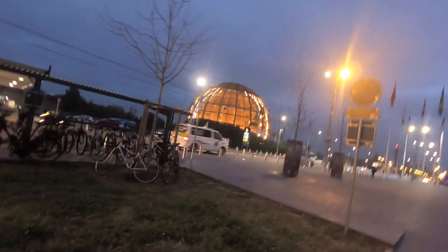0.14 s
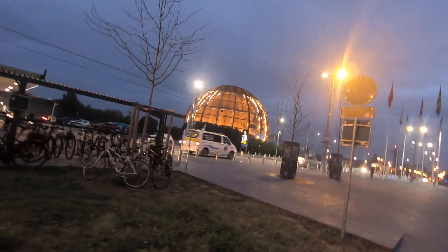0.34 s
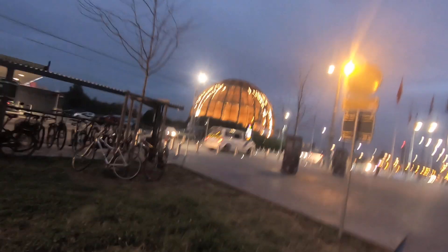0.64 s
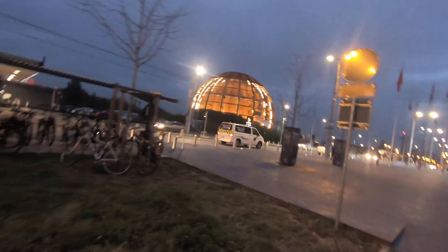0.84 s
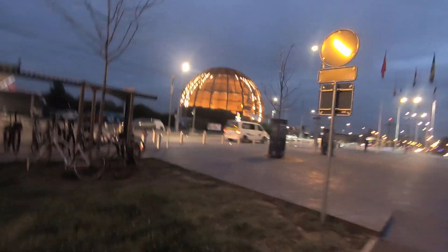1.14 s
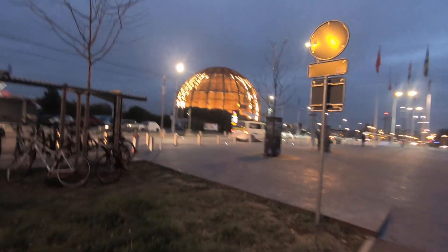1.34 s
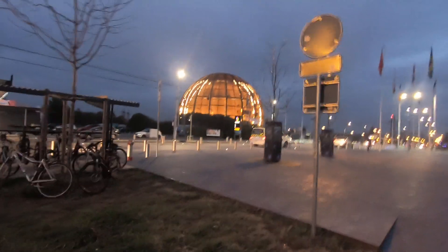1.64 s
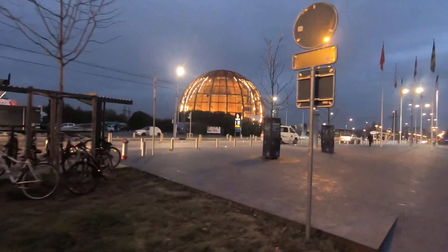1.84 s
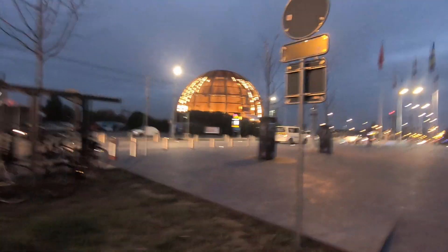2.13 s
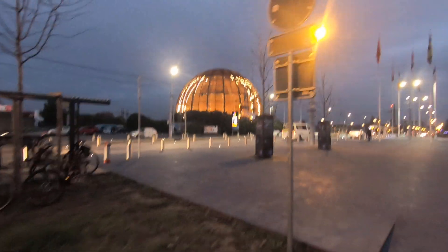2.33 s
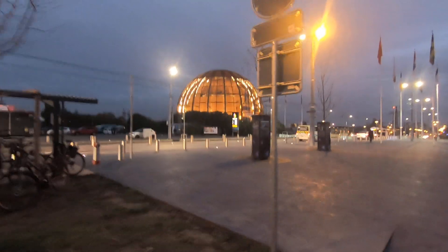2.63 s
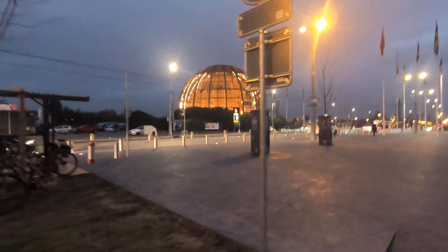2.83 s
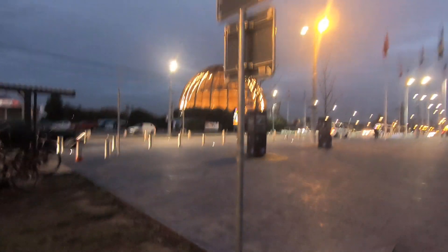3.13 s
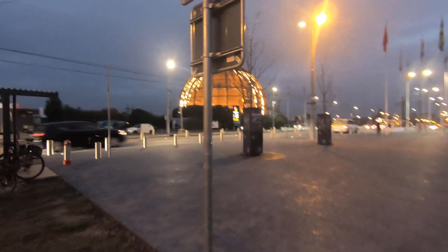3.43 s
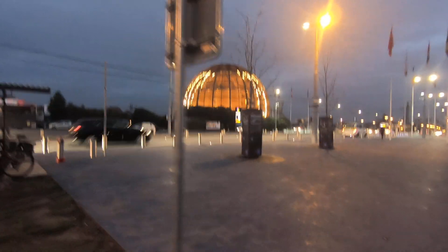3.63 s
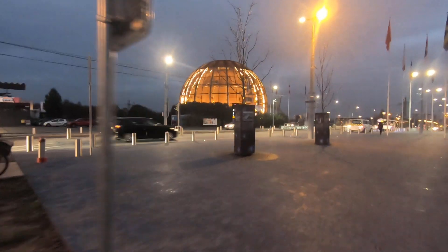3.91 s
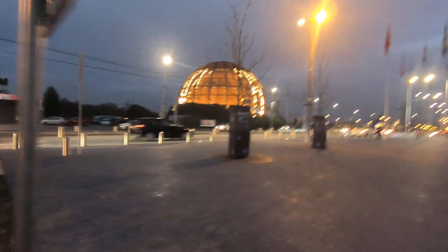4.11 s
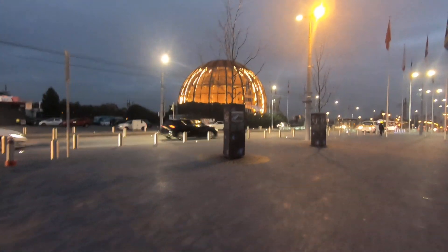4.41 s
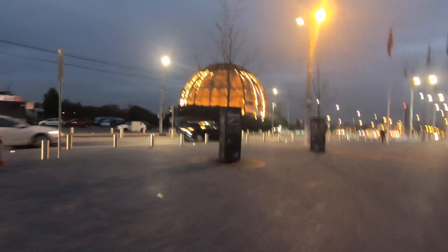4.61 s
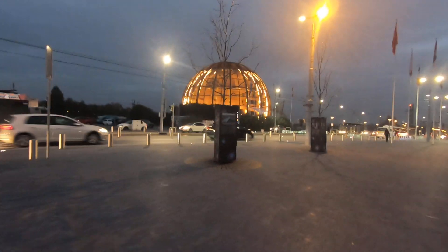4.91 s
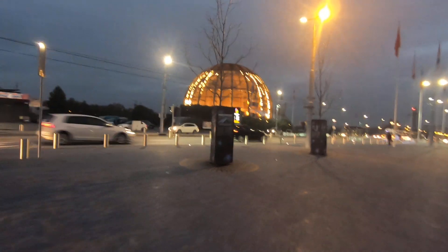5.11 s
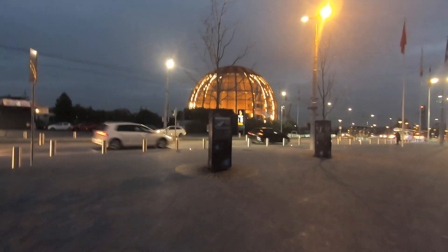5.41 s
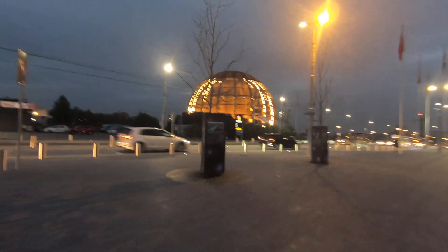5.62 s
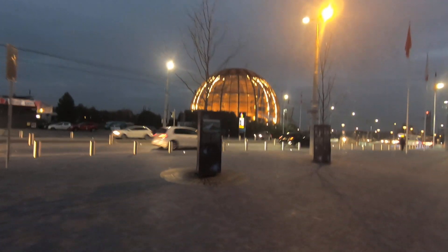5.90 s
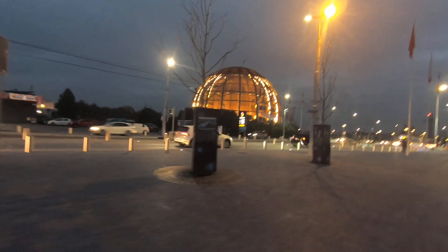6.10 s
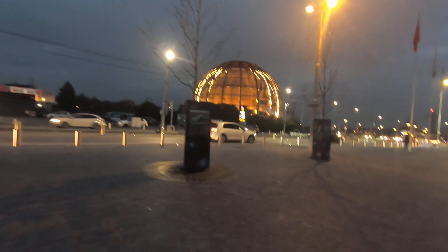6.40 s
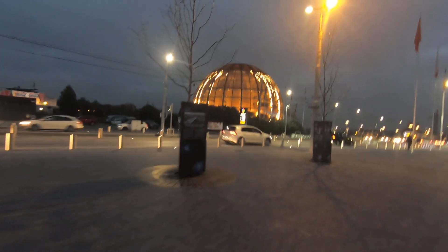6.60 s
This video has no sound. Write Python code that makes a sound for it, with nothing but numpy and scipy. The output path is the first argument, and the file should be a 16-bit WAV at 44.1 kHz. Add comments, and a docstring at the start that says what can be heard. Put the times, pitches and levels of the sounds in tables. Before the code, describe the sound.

Close to the microphone, a twin-cylinder motorcycle throbs in a deep, limping beat beside a busy open road. It pulls gradually harder, growling and rasping, with small ticks from a loose part near the end. The throttle then shuts with a pop and the engine sinks to a soft, irregular burble, while tyre noise, low rumble and a passing car's hum come forward.

```python
"""A V-twin motorcycle engine throbs beside a busy road, gathers a little speed, then drops to an uneven burble.
Each firing is a pulse that rings the exhaust pipe: a thump below, with growl, bark and rasp under throttle.
Noise in two narrow bands makes the intake's faint hoot; short noise bursts make a loose part's ticks. Behind it
cars pass as coloured noise for tyres over a low rumble that swells now and then, and a stack of sines for one
humming engine. A short airy tone of narrow noise, swishes in the treble and one thin brake squeal of sines are
also heard."""
import sys
import numpy as np
from scipy import signal
from scipy.fft import rfft, irfft
from scipy.io import wavfile
from scipy.ndimage import uniform_filter1d

SR = 44100
rng = np.random.default_rng(int(sys.argv[2]) if len(sys.argv) > 2 else 0)


def unload_wav(signal):
    """Save mono or channel-first audio to the path in sys.argv[1] as 16-bit WAV at rate SR, clipped to [-1, 1]."""
    wavfile.write(
        sys.argv[1],
        SR,
        np.round(np.clip(np.atleast_2d(signal).T, -1, 1) * 32767).astype(np.int16),
    )


N = 297671
TIME = np.arange(N) / SR
BINS = np.fft.rfftfreq(N, 1 / SR)

# Engine speed, two firings in each cycle. Each row: time in seconds, cycles per second in Hz.
ENGINE_SPEED = [(0.0, 13.81), (0.12, 14.8), (.26, 15.1), (.44, 14.93), (.6, 15.11), (1.55, 15.703),
                (1.95, 15.705), (2.5, 16.3), (3.0, 16.745), (3.65, 16.855), (4.2, 17.3), (4.7, 18.56),
                (5.0, 18.24), (5.3, 16.997), (5.8, 16.001), (6.75, 15.799)]
# Unevenness of combustion. Each row: time in seconds, spread of push strength in dB, spread of firing
# time in seconds, gap between the two cylinders in cycles, extra crack of the second cylinder in dB.
COMBUSTION = [(0, .7, .0003, .422, -1), (1.4, .7, .0002, .42, .5), (1.8, 1.2, .0003, .42, .5),
              (2.4, .8, .0002, .424, 2), (3.0, .9, .00025, .425, 3), (3.45, 1.3, .0005, .422, 1),
              (4.1, .7, .0002, .427, 3), (4.7, .6, .00015, .419, -.5), (4.95, 3, .002, .42, 0),
              (6.75, 3.5, .003, .42, 0)]
# Throttle: cruising, a blip, a long pull, then shut. Each row: time in seconds, effort in dB above cruising.
EFFORT = [(0, -3.5), (.15, -1.5), (1.35, 0.5), (1.75, -4), (2.25, -3.5), (2.5, 2.5), (2.7, -3), (3.3, -1.5),
          (4.0, 0), (4.3, 1.5), (4.68, 3), (4.85, -11), (5.25, -21), (5.7, -26), (5.95, -16), (6.75, -24.5)]


def motorcycle():
    """Firings ring the pipe with a thump; an open throttle adds growl, bark and rasp, ruffled by rushing gas."""
    # Exhaust pipe and silencer. Each row: frequency in Hz, relative gain in dB.
    pipe_spectrum = [(20, -52), (45, -21), (60, -4.5), (75, -0.2), (86, -4), (120, 4), (152, -10.5),
                     (170, -7), (188, -18.5), (222, -14), (268, -21), (305, -18.5), (335, -19.5),
                     (390, -27), (480, -47), (2500, -100)]
    # Pops as the throttle shuts. Each row: start in seconds, peak of the pipe in dB, peak of the rasp in dB.
    pops = [(4.912, -11.5, -27), (4.976, -20, -48.5)]
    effort = curves(EFFORT)[0]
    pushes, cracks = firings()
    pipe = ring(pipe_spectrum)
    exhaust = signal.fftconvolve(pushes, pipe)[:N]
    fronts = signal.fftconvolve(cracks, pipe)[:N]
    growl_hz, bark_hz = 148, 262  # where the growl takes over from the thump, and the bark from the growl
    low = below(exhaust, growl_hz)
    thump = exhaust_thump(low, effort)
    growl = exhaust_growl(below(exhaust - low, bark_hz), effort)
    bark = exhaust_bark(fronts - below(fronts, bark_hz), effort)
    rasp, crack = exhaust_rasp(cracks)

    gas_db, rasp_gas_db = -17, -11  # depth of the ruffling
    ruffled_growl = growl * (1 + amp(gas_db) * drift(75))
    ruffled_rasp = rasp * (1 + amp(rasp_gas_db) * drift(100))
    upper = ruffled_growl + bark + ruffled_rasp
    direct = thump + upper + reflection(upper)
    for s, db, crack_db in pops:
        add(direct, s, amp(db) * pipe / abs(pipe).max() + amp(crack_db) * crack / abs(crack).max())
    echo_db, thump_echo_db = -11, -24
    return direct + scattered_echoes(amp(echo_db) * upper + amp(thump_echo_db) * thump)


def firings(second_db=-1, crack_spread=1.8):
    """Two pulse trains: the push of each firing, and the crack of its front, which varies more in strength."""
    s = firing_times()
    spread_db, jitter_s, _, second_crack_db = curves(COMBUSTION, s)
    strength, late = np.clip(rng.standard_normal((len(s), 2)), -2, 2).T
    second = np.arange(len(s)) % 2
    pushes, cracks = np.zeros((2, N))
    at = np.clip(np.round((s + jitter_s * late) * SR).astype(int), 0, N - 1)
    pushes[at] = amp(spread_db * strength + second * second_db)
    cracks[at] = amp(crack_spread * spread_db * strength + second * second_crack_db)
    return pushes, cracks


def firing_times(first=0.029):
    """Two cylinders fire close together, then rest: a limping rhythm."""
    cycles = np.cumsum(curves(ENGINE_SPEED)[0]) / SR
    lead = np.arange(int(cycles[-1]) + 1) + first  # in cycles
    gap = curves(COMBUSTION, np.interp(lead, cycles, TIME))[2]
    return np.interp(np.column_stack([lead, lead + gap]).ravel(), cycles, TIME)


def exhaust_thump(low, effort):
    """The deepest voice of the pipe wavers a little, and its upper part fades for moments."""
    # Fades of the upper part. Each row: middle in seconds, half width in seconds, depth in dB.
    thump_fades = [(1.6, 0.056, 2), (2.72, .08, 2), (3.4, .14, 14), (4.0, .12, 3)]
    cruising_db, db_per_effort_db, waver_db = -19, 0.46, 0.5
    level = amp(cruising_db + db_per_effort_db * effort + waver_db * drift(3.2))
    thump = level * levelled(low)
    upper_part = thump - below(thump, 100)
    fade = amp(sum(dip(*row) for row in thump_fades))
    return thump + (fade - 1) * upper_part


def exhaust_growl(band, effort):
    """The middle voice of the pipe follows the throttle, with one short extra swell."""
    cruising_db, db_per_effort_db = -35, 1
    swell_db = -dip(2.18, 0.2, 4)
    return amp(cruising_db + db_per_effort_db * effort + swell_db) * levelled(band)


def exhaust_bark(high, effort):
    """The sharp fronts bark, and the silencer shell rings on between firings as a decaying resonance."""
    cruising_db, db_per_effort_db = -39.5, 1.18
    shell_hz, shell_t60_s, shell_db = 322, 0.11, -5  # shell level against the fronts
    shell = np.cos(2 * np.pi * shell_hz * TIME) * np.exp(-np.log(1000) * TIME / shell_t60_s)
    ringing = levelled(signal.fftconvolve(high, shell)[:N])
    bark = levelled(high) + amp(shell_db) * ringing
    return amp(cruising_db + db_per_effort_db * effort) * levelled(bark)


def exhaust_rasp(cracks):
    """Cracks excite a moving resonance; returns the rasp and the impulse response of a single crack."""
    # Colour of a crack. Each row: frequency in Hz, relative gain in dB.
    crack_spectrum = [(100, -26.5), (195, -9.5), (280, -9.5), (360, 0.5), (440, 1.5), (500, -8), (600, -11),
                      (1200, -28), (8000, -90.5)]
    # Rasp over time. Each row: time in seconds, level in dB, centre in Hz.
    rasp_course = [(0, -50.5, 362), (.35, -44, 365), (1.45, -46, 360), (1.85, -53.5, 370), (2.2, -52, 370),
                   (2.48, -43.5, 430), (2.8, -49.5, 370), (3.5, -48, 378), (4.0, -42, 392),
                   (4.65, -39.5, 385), (4.85, -50.5, 390), (5.2, -62, 350)]
    db, centre_hz = curves(rasp_course)
    crack = ring(crack_spectrum)
    rasp = resonate(signal.fftconvolve(cracks, crack)[:N], centre_hz, width_hz=68)
    return amp(db) * levelled(rasp), crack


def reflection(x):
    """One strong echo off a nearby surface; its delay grows, so that partials swell and fade in turn."""
    delay_s, growth_s_per_s, db = 0.00875, 0.001686, -10
    return amp(db) * np.interp(TIME - delay_s - growth_s_per_s * TIME, TIME, x, left=0)


def intake():
    """Once a cycle the engine sucks air, and its intake hoots in two narrow bands that fade over the scene."""
    # Intake resonances. Each row: centre in Hz, width in Hz, level in dB before throttle and fade.
    resonances = [(560, 27, -57), (1012, 35, -49)]
    gulp_at, sharpness = 0.55, 1.2  # place of the gulp in the cycle, and how short it is
    db_per_effort_db, fade_db_per_s, echo_db = 1, 3, -6.5
    cycles = np.cumsum(curves(ENGINE_SPEED)[0]) / SR
    gulp = unit(np.exp(sharpness * np.cos(2 * np.pi * (cycles - gulp_at))))
    air = below(rng.standard_normal(N), 1400)
    bands = sum(amp(db) * unit(resonate(air, np.full(N, hz), width_hz)) for hz, width_hz, db in resonances)
    hoot = bands * gulp * amp(db_per_effort_db * curves(EFFORT)[0] - fade_db_per_s * TIME)
    return hoot + scattered_echoes(amp(echo_db) * hoot)


def ticks():
    """A loose part ticks on the left, each tick with a thin bright edge; clicks and scuffs sound close by."""
    # Loose part, during the long pull. Each row: start in seconds, peak of the body in dB before the
    # lean to the left, centre in Hz.
    loose_part = [(4.102, -53, 8000), (4.132, -57, 9300), (4.156, -57, 8000), (4.189, -56, 9700),
                  (4.213, -47, 9100), (4.246, -51, 9500), (4.271, -47, 8700), (4.303, -55, 8400),
                  (4.334, -51, 6700), (4.360, -54, 9800), (4.384, -49, 9200), (4.416, -46, 8900),
                  (4.44, -53, 8200), (4.472, -55, 8700), (4.495, -53, 8900)]
    # Clicks and scuffs. Each row: start in seconds, peak in dB, centre in Hz, t60 in seconds, width in octaves.
    scuffs = [(1.235, -46, 3900, .4, .35), (2.05, -39, 3200, .3, .33), (2.30, -40, 3300, .26, .33),
              (3.449, -45, 5800, .1, .42), (3.754, -33, 4500, .005, .45), (3.7585, -40, 6500, .006, .35),
              (3.782, -44, 4400, .03, .25), (3.91, -54, 8600, .03, .1), (5.104, -47.5, 8000, .11, .3),
              (5.265, -58, 9000, .02, .25), (6.548, -50, 8500, .03, .12)]
    t60_s, octaves, edge_hz, edge_db, lean_db = 0.023, 0.12, 11500, -17, 4  # lean: left over right
    out = np.zeros((2, N))
    lean = amp(np.array([[.5], [-.5]]) * lean_db)
    for s, db, hz in loose_part:
        body = burst(hz, t60_s, octaves)
        edge = amp(edge_db) * burst(edge_hz, t60_s, octaves)
        add(out, s, amp(db) * lean * (body + edge))
    for s, db, hz, scuff_t60_s, scuff_octaves in scuffs:
        add(out, s, amp(db) * burst(hz, scuff_t60_s, scuff_octaves))
    return out


def burst(hz, t60_s, octaves, size=16384):
    """A dying puff of noise round one frequency, of peak 1, a little different in each ear."""
    rise_s = 0.0004
    f, t = np.fft.rfftfreq(size, 1 / SR), np.arange(size) / SR
    band = np.exp(-.5 * (np.log2((f + 1) / hz) / octaves) ** 2)
    envelope = np.minimum(t / rise_s, 1) * np.exp(-np.log(1000) * t / t60_s)
    x = irfft(rfft(rng.standard_normal((2, size))) * band) * envelope
    x = x + .3 * x[::-1]  # some of each ear in the other
    return x / abs(x).max()


def car():
    """An engine hum of sine harmonics swells in, rises in pitch and wavers as the car rolls by."""
    # One row: heard from in seconds, rise in seconds, level in dB at that start, firing rate in Hz at
    # that start, pitch gain in Hz per second, loss in dB per second (negative grows louder).
    near_car = (5.5, 0.1, -32, 47.5, 7, -2)
    # Harmonics of the firing rate. Each row: multiple, relative level in dB.
    orders = [(1, -1.5), (2, 1), (3, -17), (4, -32), (5, -29.5)]
    start, rise, db, hz, hz_per_s, fade_db_per_s = near_car
    age = np.maximum(TIME - start, 0)
    turns = np.cumsum((hz + hz_per_s * age) * (1 + 0.011 * drift(8.4))) / SR
    hum = sum(amp(level) * np.sin(2 * np.pi * (round(k) * turns + rng.random())) for k, level in orders)
    return unit(hum) * np.minimum(age / rise, 1) * amp(db - fade_db_per_s * age + 4.1 * drift(5.3))


def airy_tone():
    """A short, airy narrow band of noise near 1.9 kHz whose pitch sags, then rises."""
    # Each row: time in seconds, centre in Hz, level in dB.
    airy_tone_course = [(2.93, 1880, -60), (2.98, 1910, -49), (3.03, 1860, -51.5), (3.075, 1790, -50),
                        (3.105, 1865, -43), (3.135, 1970, -47.5), (3.16, 1960, -62)]
    width_hz, echo_db = 95, -7
    hz, db = curves(airy_tone_course)
    turn = 2 * np.pi * np.cumsum(hz) / SR
    tone = (drift(width_hz) * np.cos(turn) + drift(width_hz) * np.sin(turn)) * amp(db)
    tone = tone * ((TIME > airy_tone_course[0][0]) & (TIME < airy_tone_course[-1][0]))
    return tone + amp(echo_db) * scattered_echoes(tone)


def brake():
    """A far brake disc sings for a moment in thin, slightly trembling sine tones."""
    # Each row: frequency in Hz, level in dB.
    tones = [(11723, -80), (12275, -85.5)]
    start, end = 5.73, 5.95
    squeal = sum(amp(db) * np.sin(2 * np.pi * np.cumsum(hz + 7 * drift(40)) / SR) for hz, db in tones)
    return arch(start, end - start) * squeal


def swishes(octaves=.13):
    """Airy swells of noise in the treble, each round one frequency."""
    # Each row: start in seconds, length in seconds, level in dB, centre in Hz.
    swells = [(-.05, 0.15, -63, 9541), (.85, 0.71, -67.5, 8800), (2.96, 0.6363, -71, 9801),
              (2.98, 0.54, -84, 13300), (3.02, 0.43, -66, 5900), (3.04, 0.1276, -57.5, 4400),
              (3.07, 0.1523, -68.5, 10280), (5.1, 0.1179, -62, 4666), (5.74, 0.2375, -66, 4598)]
    out = np.zeros((2, N))
    for start, length, db, hz in swells:
        band = np.exp(-.5 * (np.log2((BINS + 1) / hz) / octaves) ** 2)
        air = unit(irfft(rfft(rng.standard_normal((2, N))) * band, N))
        out += amp(db) * arch(start, length) * air
    return out


def traffic():
    """Tyre roar and hiss grow as each car nears, over a distant wash and a low rumble that swells now and then,
    with lulls between cars."""
    # Cars rolling past. Each row: nearest at in seconds, time to pass in seconds, tyre roar in dB.
    passes = [(2.272, 0.15, -45), (3.8, 0.58, -43), (5.92, 0.2, -40), (6.699, .2, -41)]
    # Lulls. Each row: middle in seconds, half length in seconds, dip of roar in dB, dip of hiss in dB.
    lulls = [(2.735, 0.27, 0.5, 3), (4.802, 0.43, 1, 3)]
    # Colours of the noise. Each row: frequency in Hz, relative density in dB.
    roar_spectrum, hiss_spectrum, rumble_spectrum = [(150, -5.5), (400, -4.5), (560, -3.5), (740, -3.5),
                                                     (900, -1), (1020, 1), (1150, -0.5), (1400, -1.5),
                                                     (1800, -6.5), (2200, -12.5), (3000, -17), (5000, -49),
                                                     (12000, -89)], [(1200, -14.5), (2200, -4.5), (3000, -2),
                                                                   (3600, -5), (4500, -11), (5700, -12),
                                                                   (7200, -17.5), (9000, -18.5),
                                                                   (10200, -26), (11500, -37.5),
                                                                   (13000, -45.5), (15000, -57.5)], [(12, -28.5), (26, -13),
                                                                                 (40, 1.5), (65, 2.5),
                                                                                 (110, -6.5), (160, -5.5),
                                                                                 (250, -10.5), (350, -23),
                                                                                 (550, -44.5), (1200, -69),
                                                                                 (5000, -100)]
    # Low rumble. Each row: time in seconds, level in dB.
    rumble_course = [(.4, -32.5), (.57, -28), (.8, -31), (1.9, -32.5), (2.25, -28), (2.7, -31),
                     (4.0, -30.5), (4.18, -28.5), (4.35, -27.5), (4.55, -29), (4.85, -28), (5.33, -30),
                     (5.7, -30), (5.92, -28), (6.2, -28.5), (6.75, -28.5)]
    far_roar_db, far_hiss_db, tyre_hiss_db = -41, -54, -22.5  # the last is hiss against roar as a car passes
    near = np.sqrt(sum(amp(db) ** 2 / (1 + ((TIME - s) / passing) ** 2) for s, passing, db in passes))
    roar_lulls = amp(sum(dip(s, half, db, order=4) for s, half, db, _ in lulls))
    hiss_lulls = amp(sum(dip(s, half, db, order=4) for s, half, _, db in lulls))
    roar_level = np.hypot(amp(far_roar_db), near) * roar_lulls
    hiss_level = np.hypot(amp(far_hiss_db), amp(tyre_hiss_db) * near) * hiss_lulls
    roar = roar_level * street_noise(roar_spectrum, patchy_db=0.71)
    hiss = hiss_level * street_noise(hiss_spectrum, patchy_db=0.86) * amp(.6 * drift(4.8))
    rumble = amp(curves(rumble_course)[0]) * street_noise(rumble_spectrum, patchy_db=.8, size=4096)
    return roar + hiss + rumble


def street_noise(spectrum, patchy_db, size=1024):
    """Stereo noise of a given colour with drifting patches, built from random spectral frames."""
    # Each row: frequency in Hz, left-right likeness (limited to -1..1 when read).
    likeness = [(25, 0.2), (70, 1.7), (300, 1.5), (550, 0.8137), (1000, 0.28), (2000, 0.1882), (3800, .5),
                (6000, -0.11), (10000, 0.025)]
    # Each row: frequency in Hz, left minus right in dB.
    stereo_lean = [(50, 0), (250, 0.3), (550, 1), (1100, 4.5), (2200, 2.5), (4000, -.5), (9000, 0.5)]
    hz = np.fft.rfftfreq(size, 1 / SR)
    a, b, c, d, patches = rng.standard_normal((5, N // (size // 4) + 5, len(hz)))
    patches = uniform_filter1d(patches, size=14, axis=0)  # smooth in time
    patches = unit(uniform_filter1d(patches, size=10, axis=1))  # smooth in frequency
    same = np.clip(across(likeness, hz), -1, 1)
    lean = amp(across(stereo_lean, hz) / 2)
    left = a + 1j * b
    right = same * left + np.sqrt(1 - same ** 2) * (c + 1j * d)
    z = np.array([left * lean, right / lean]) * amp(across(spectrum, hz) + patchy_db * patches)
    x = signal.istft(z.transpose(0, 2, 1), nperseg=size, noverlap=size - size // 4)[1][:, :N]
    return x / x.mean(0).std()


def scattered_echoes(x, t60_s=0.14, size=13230):
    """Scattered echoes from paving, shelters and walls, different in each ear."""
    t = np.arange(size) / SR
    envelope = np.exp(-np.log(1000) * t / t60_s) * (1 - np.exp(-t / 0.013))
    taps = rng.standard_normal((2, size)) * envelope
    taps = taps + .5 * taps[::-1]
    return signal.fftconvolve(x[None], taps / np.linalg.norm(taps[0]), axes=1)[:, :N]


def amp(db):
    """Decibels to gain."""
    return 10 ** (np.asarray(db) / 20)


def unit(x):
    """Scales to an rms of 1."""
    return x / np.sqrt(np.mean(x ** 2) + 1e-20)


def curves(rows, t=TIME):
    """Each column of a table, joined by straight lines in time."""
    s, *columns = np.transpose(rows)
    return [np.interp(t, s, c) for c in columns]


def across(points, hz):
    """Reads a spectrum on a log-frequency axis."""
    f, value = np.transpose(points)
    return np.interp(np.log(hz + 1), np.log(f), value)


def add(mix, s, sound):
    """Mixes a sound in at a time."""
    part = mix[..., max(round(s * SR), 0):][..., :sound.shape[-1]]
    part += sound[..., :part.shape[-1]]


def drift(rate_hz):
    """Random wandering below a rate, with an rms of 1."""
    return unit(irfft(rfft(rng.standard_normal(N)) / (1 + (BINS / rate_hz) ** 4), N))


def ring(points, size=16384):
    """The causal (minimum-phase) impulse response of a spectrum."""
    log_gain = np.log(amp(across(points, abs(np.fft.fftfreq(size, 1 / SR)))))
    response = np.fft.ifft(np.exp(np.conj(signal.hilbert(log_gain)))).real
    return response[:size // 2] * np.hanning(size)[size // 2:]


def levelled(x, size=17640):
    """Divides out the slow level and keeps the throb."""
    window = np.hanning(size)
    weight = signal.fftconvolve(np.ones(N), window, "same")
    power = abs(signal.fftconvolve(x ** 2, window, "same")) / weight
    return x / np.sqrt(power + 1e-14)


def below(x, hz, order=12):
    """The part of a sound under a frequency."""
    return irfft(rfft(x) / (1 + (BINS / hz) ** order), N)


def resonate(x, hz, width_hz):
    """A resonance of gain 1 that follows a curve: shift down to zero, smooth, shift back up."""
    turn = np.exp(2j * np.pi * np.cumsum(hz) / SR)
    r = np.exp(-np.pi * width_hz / SR)
    return 2 * (turn * signal.lfilter([1 - r], [1, -r], x / turn + 1e-18)).real


def dip(s, half_width, depth_db, order=2):
    """A smooth loss of level in dB; a higher order gives it a flatter bottom."""
    return -depth_db * np.exp(-abs((TIME - s) / half_width) ** order)


def arch(start, length):
    """A rounded swell that begins and ends in silence."""
    return np.sqrt(np.maximum(np.sin(np.pi * np.clip((TIME - start) / length, 0, 1)), 0))


def scene():
    """The near engine in front of the road, with the airy tone and swishes."""
    near = motorcycle() + intake() + ticks()
    road = traffic() + car() + brake()
    return near + road + airy_tone() + swishes()


def record(dry, ceiling=0.5, edge_hz=15600):
    """Two close microphones hear the sound a little apart; tall thumps are rounded off, then the band is limited."""
    # Lead of the left microphone over the right. Each row: frequency in Hz, phase in radians.
    left_lead = [(50, .14), (130, .14), (300, .29), (450, .5), (800, .4), (1400, .4), (3000, .2), (8000, 0)]
    balance_db = -.65  # left against right
    left_over_right = amp(balance_db) * np.exp(1j * across(left_lead, BINS))
    ports = irfft(rfft(dry) * left_over_right ** np.array([[.5], [-.5]]), N)
    rounded = ceiling * np.tanh(ports / ceiling)
    band_limit = signal.firwin(511, edge_hz, window=("kaiser", 9), fs=SR)
    return signal.oaconvolve(rounded, band_limit[None], "same")


dry = scene()
out = record(dry)
unload_wav(out)
```